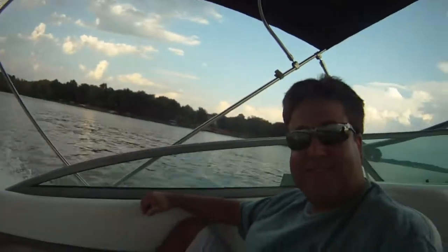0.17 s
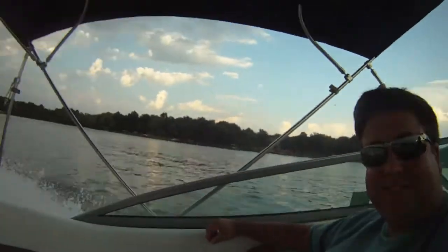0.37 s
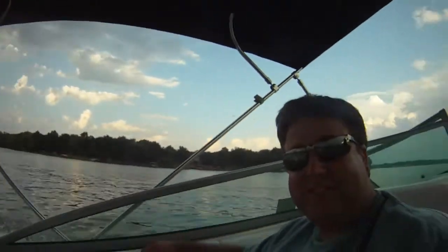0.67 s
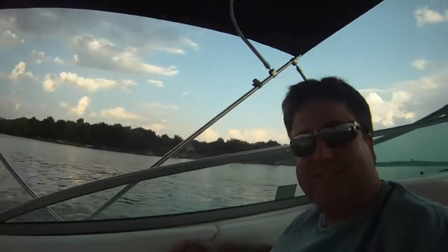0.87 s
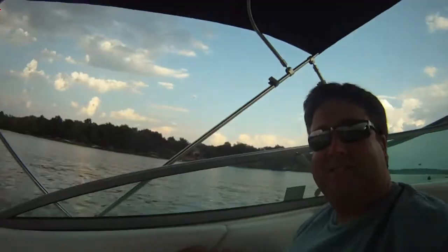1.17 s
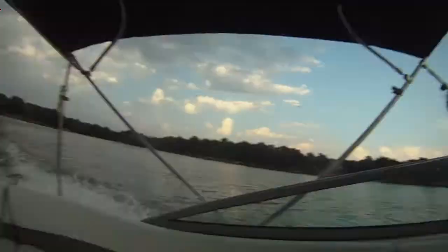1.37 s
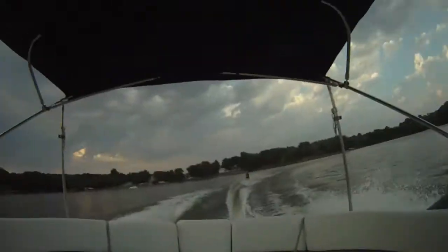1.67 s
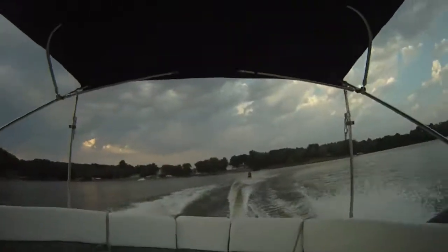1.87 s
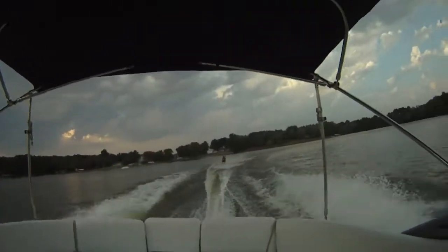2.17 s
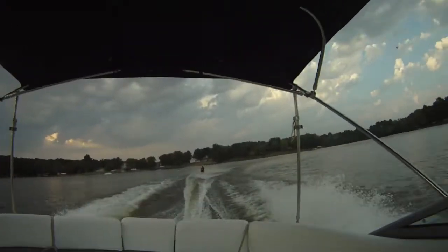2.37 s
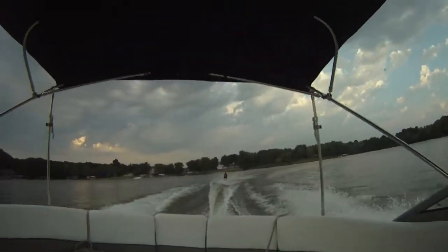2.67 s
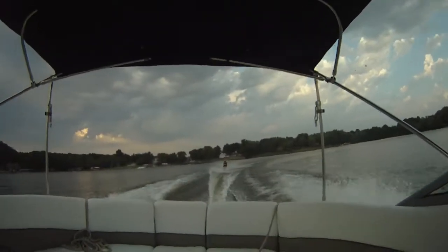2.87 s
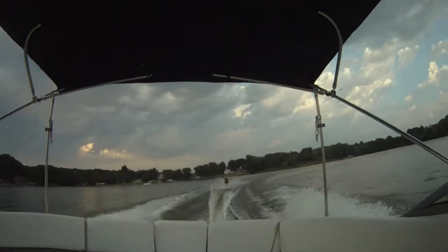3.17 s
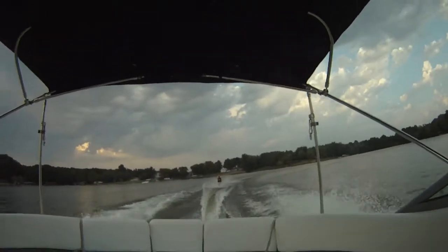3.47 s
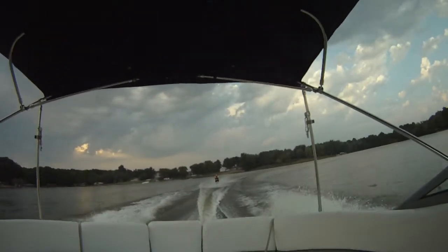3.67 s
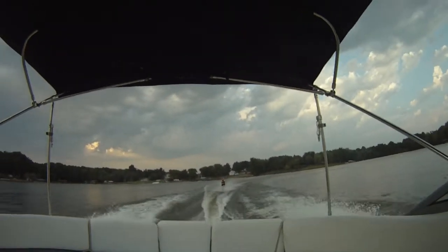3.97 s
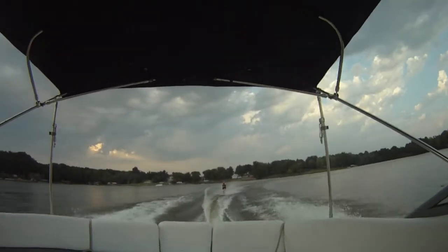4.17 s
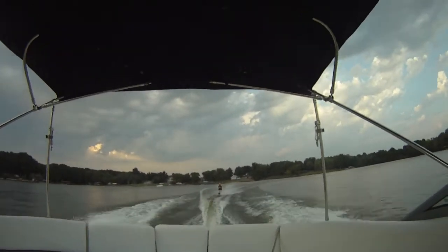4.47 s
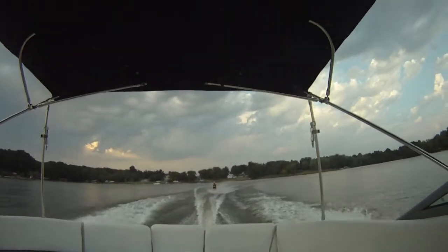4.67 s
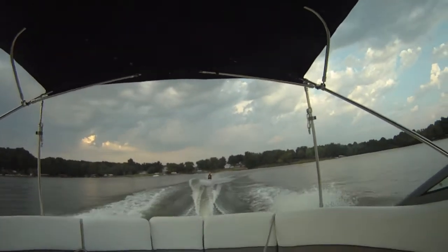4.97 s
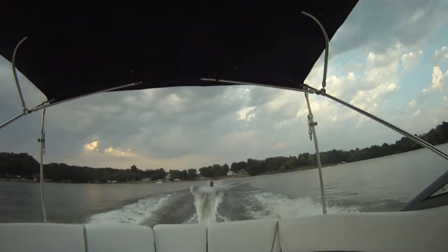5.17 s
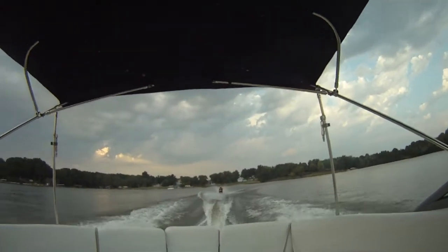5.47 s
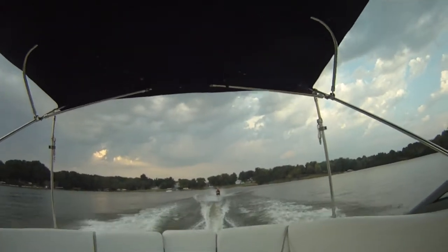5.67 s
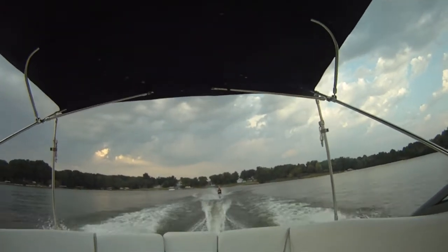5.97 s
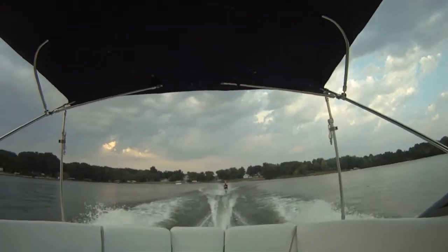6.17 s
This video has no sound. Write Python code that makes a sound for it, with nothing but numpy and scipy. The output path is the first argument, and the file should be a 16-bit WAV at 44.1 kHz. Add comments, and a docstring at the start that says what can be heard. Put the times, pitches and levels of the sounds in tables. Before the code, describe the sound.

Close plastic rattles and creaks break over a hollow water roar and low engine drone, then the lake ride settles with only occasional knocks.

```python
"""Motorboat on a lake

A motorboat tows a skier; a small camera on board, in a plastic case, hears it. The engine hum is a sum of
sines on multiples of the engine cycle. Wake, bow spray and gusty wind are filtered noise.
Filtered noise also gives the rubbing of fingers on the case. Creaks, taps and knocks are impulse responses
of its resonances. The bow hiss is lost as the camera turns to the stern."""
import sys
import numpy as np
from scipy import signal
from scipy.fft import rfft, irfft
from scipy.io import wavfile
from scipy.ndimage import uniform_filter1d

SR = 44100
rng = np.random.default_rng(int(sys.argv[2]) if len(sys.argv) > 2 else 0)


def generate_wav(signal):
    """Clip the signal to [-1, 1] and save it as 16-bit WAV at the path in sys.argv[1]."""
    frames = np.transpose(np.atleast_2d(signal))
    scaled = np.clip(frames, -1, 1) * 32767
    pcm = np.round(scaled).astype(np.int16)
    wavfile.write(sys.argv[1], SR, pcm)


N = 279153
TIME = np.arange(N) / SR
FREQS = np.fft.rfftfreq(N, 1 / SR)

# Colour of the wind: f/Hz, relative spectral level/dB
WIND_SPECTRUM = [(8, 0), (20, 0), (45, 1), (80, -1), (160, -11.5), (300, -22), (700, -26), (3000, -37)]
# Gusts: peak t/s, length/s, peak level/dB
GUST_ROWS = [(.14, 0.28, -38.5), (.42, .26, -36), (.81, 0.32, -40), (1.29, 0.46, -42.5), (2.06, .12, -43),
             (2.26, .18, -45), (2.65, 1, -48), (3.97, 0.11, -49), (4.38, 0.44, -47.5)]
# Modes of the plastic shell: f/Hz, width/Hz, relative level/dB
SHELL_MODES = [(714, 260, -22), (1158, 184, -4.5), (1533, 380, -2.5), (2127, 266, 0), (2250, 114, -1.5),
               (3476, 340, -10), (3715, 230, -13), (4950, 630, -26)]
# Ring of the camera mount, which depends on the grip: t/s, f/Hz
MOUNT_PITCH = [(0, 892), (3, 885), (4.4, 830)]
# Fingers rubbing the case: peak t/s, length/s, peak level/dB
RUB_STROKES = [(.366, 0.053, -31), (.39, 0.38, -39.5), (.8, 0.19, -46), (1.4, 0.25, -40.5)]
# Stick-slip jerks of the creaking case: t/s, level/dB
CREAK_JERKS = [(.41148, -12.5), (.4183, -10.5), (.42706, -11), (.44599, -8.6), (.4522, -10),
               (.45774, -10.5), (.46347, -11.5), (.47177, -12.5)]
# Fingers tapping the shell: t/s, level/dB, thump level/dB re shell, brightness/(dB per octave)
FINGER_TAPS = [(.2915, -27, -4, 7), (.3394, -19, 3, -2), (.7702, -33, -5, -4), (.7825, -24.5, -1, -6),
               (.7933, -27.5, -5, -10), (.8748, -24.5, -19, 1.5), (1.3292, -18.5, 3.5, -3),
               (1.4501, -31.5, -8, 4), (2.0574, -32, 0, -10), (2.074, -28, -2, -5), (2.1316, -26, -14, -2)]
# Knocks of the case in its mount: t/s, level/dB, thump level/dB re shell, mount level/dB re shell
MOUNT_KNOCKS = [(.3075, -23, 8, 8), (0.3121, -21, 10, 9), (0.326, -18.5, 11, 4), (.3441, -19, 0, 2),
                (2.8798, -39, -4, 12), (2.894, -37, 4, 8), (2.9052, -35.5, 12, 8), (2.9349, -34.5, 6, 9),
                (2.996, -26.5, -14, 4), (3.168, -40, 0, 10), (4.3378, -30.5, 5, 2), (4.3713, -32.5, 1, 3),
                (4.416, -25, 0, 7), (5.04, -37, -7, 9)]
# Rush of the wake before the case colours it: f/Hz, relative spectral level/dB
WAKE_SPECTRUM = [(30, -16), (100, -3), (190, 0), (300, -7.5), (400, -7), (620, -12), (1000, -7),
                 (1300, -10.5), (1900, -10.5), (2600, -5), (3700, -3.5), (4150, -12.5), (5300, -9.5),
                 (5900, -18.5)]
# Air resonances of the hollow case, applied to the wake: f/Hz, width at half the lift/Hz, lift level/dB
CASE_CAVITY = [(484, 60, 1.5), (920, 60, 4.5), (1496, 157, 7), (1767, 59, 6), (2181, 390, 16.5),
               (3054, 240, 5), (3363, 233, 4.5), (5110, 170, 3.5)]
# Engine speed: t/s, firing rate f/Hz
FIRING_RATE = [(0, 218), (1.5, 218), (3.3, 219), (4.4, 220.4), (5.1, 220.1), (6, 221.5), (6.33, 220.7)]
# Exhaust tones: multiple of the engine cycle, relative level/dB before the tilt
EXHAUST_TONES = [(4, 2), (6, -8), (7, -8), (8, -0.5), (9, -8), (10, -11.5), (11, -9), (12, -16.5),
                 (14, -16.5), (15, -40), (16, -6.5), (17, -14.5), (18, -27), (19, -18), (33, -16),
                 (35, -13.5), (37, -34), (44, -18.5)]

# Steady wind sinks from the open level to the sheltered one
WIND_OPEN_DB, WIND_SHELTERED_DB, WIND_SETTLED_S = -44, -53.5, 2.9
# Whole case bouncing, and the width of the mount resonance
THUMP_HZ, THUMP_WIDTH_HZ, MOUNT_WIDTH_HZ = 129, 322, 173
# Thump and mount levels are relative to the shell
CREAK_THUMP_DB, CREAK_BRIGHT_DB_PER_OCTAVE, CREAK_MOUNT_DB = -2, -1.5, -30
TAP_MOUNT_DB, KNOCK_BRIGHT_DB_PER_OCTAVE = -4.5, 7
# Middle and length of the turn to the stern, and the hiss heard before it
TURN_S, TURN_LENGTH_S = 1.37, .25
BOW_HZ, BOW_WIDTH_HZ, BOW_DB = 4560, 390, -57
# Wake: starting level, slow fall, rms depth and upper rate of its random swell
SPRAY_DB, SPRAY_DB_PER_S, SWELL_DB, SWELL_HZ = -39, -0.2, 0.32, 1.2
# Engine: starting level and spectral tilt, each with its change per second
HUM_DB, HUM_DB_PER_S, CYLINDERS = -45.5, -0.41, 8
TILT_DB_PER_OCTAVE, TILT_DB_PER_OCTAVE_PER_S = -2.5, 0.74
# Sampling rate of the camera and its final band limit
SAMPLING_HZ, EDGE_HZ = 12000, 15350


def amp(db):
    """Level to amplitude: 20 dB is a factor of ten."""
    return 10 ** (np.asarray(db) / 20)


def evened(x):
    """Normalisation: scales a signal to rms 1."""
    return x / np.sqrt(np.mean(x ** 2) + 1e-20)


def curve(rows):
    """Linear interpolation of (t/s, value) rows over the scene."""
    return np.interp(TIME, *np.transpose(rows))


def spectrum(points, hz):
    """Linear interpolation of (f/Hz, level/dB) points on a log-frequency axis."""
    f, db = np.transpose(points)
    return np.interp(np.log(hz + 1), np.log(f + 1), db)


def peak(hz, centre, width):
    """Resonance: the amplitude gain falls to half at half the width from the centre."""
    return 1 / (1 + (2 * (hz - centre) / width) ** 2)


def coloured(x, gain):
    """Linear filtering by a gain over FREQS, then scaling to rms 1."""
    return evened(irfft(rfft(x) * gain, N))


def drift(rate_hz):
    """Low-pass noise: a random fluctuation of rms 1, mostly slower than rate_hz."""
    slow = coloured(rng.standard_normal(N), 1 / (1 + (FREQS / rate_hz) ** 4))
    return evened(slow - slow.mean())


def swells(rows):
    """Power addition of half-cosine envelopes, one per (peak t/s, length/s, level/dB) row."""
    power = 0
    for s, length, db in rows:
        phase = np.pi * np.clip((TIME - s) / length, -.5, .5)
        power = power + (amp(db) * np.cos(phase)) ** 2
    return np.sqrt(power)


def wind(lumps_db=2.5):
    """Turbulence: lumpy low-frequency eddies buffet the case, steadily and in gusts."""
    lumpy = rng.standard_normal(N) * amp(lumps_db * drift(31))
    eddies = coloured(lumpy, amp(spectrum(WIND_SPECTRUM, FREQS)))
    # Even out the slow power, so that the steady wind and gusts set the slow swell
    eddies /= np.sqrt(uniform_filter1d(eddies ** 2, size=SR // 8))
    steady = amp(np.interp(TIME, [0, WIND_SETTLED_S], [WIND_OPEN_DB, WIND_SHELTERED_DB]))
    return np.hypot(steady, swells(GUST_ROWS)) * eddies


def shell(hz):
    """Modal response: the modes of the plastic shell add in power."""
    power = sum((amp(db) * peak(hz, centre, width)) ** 2 for centre, width, db in SHELL_MODES)
    return np.sqrt(power)


def rubbing(grain_db=4):
    """Friction: fine random grains excite the shell under each stroke of the fingers."""
    grains = rng.standard_normal(N) * amp(grain_db * drift(160))
    return swells(RUB_STROKES) * coloured(grains, shell(FREQS))


def ring(gain, size=2048):
    """Minimum phase: a gain over frequency fixes the causal response; rms 1 over its first 2 ms."""
    two_sided = np.r_[gain, gain[-2:0:-1]]
    log_gain = np.log(np.maximum(two_sided, 1e-4))
    response = np.exp(np.conj(signal.hilbert(log_gain)))
    sound = np.fft.ifft(response).real[:size // 2]
    return sound / np.sqrt(np.mean(sound[:SR // 500] ** 2))


def click(s, db, thump_db, bright_db, mount_db, size=2048):
    """Impulse response: one blow rings the shell and the mount, and shoves the whole case."""
    hz = np.fft.rfftfreq(size, 1 / SR)
    shove = peak(hz, THUMP_HZ, THUMP_WIDTH_HZ) * hz / np.hypot(hz, 70)  # high-passed at 70 Hz
    octaves = np.log2(np.clip(hz, 700, 3000) / 1600)  # brightness tilts about 1600 Hz
    mount = peak(hz, np.interp(s, *np.transpose(MOUNT_PITCH)), MOUNT_WIDTH_HZ)
    parts = [shell(hz) * amp(bright_db * octaves), amp(thump_db) * shove, amp(mount_db) * mount]
    return -amp(db) * ring(np.linalg.norm(parts, axis=0))  # parts add in power


def add(mix, s, sound):
    """Superposition: adds a sound to the mix at time s."""
    part = mix[round(s * SR):][:len(sound)]
    part += sound[:len(part)]


def creaks(mix):
    """Stick-slip: each sudden slip of the creaking case is a blow."""
    for s, db in CREAK_JERKS:
        add(mix, s, click(s, db, CREAK_THUMP_DB, CREAK_BRIGHT_DB_PER_OCTAVE, CREAK_MOUNT_DB))


def taps(mix):
    """Impact: each finger tap excites the shell with its own thump and brightness."""
    for s, db, thump_db, bright_db in FINGER_TAPS:
        add(mix, s, click(s, db, thump_db, bright_db, TAP_MOUNT_DB))


def knocks(mix):
    """Impact: each knock of the case in its mount has its own thump and mount ring."""
    for s, db, thump_db, mount_db in MOUNT_KNOCKS:
        add(mix, s, click(s, db, thump_db, KNOCK_BRIGHT_DB_PER_OCTAVE, mount_db))


def handling():
    """Superposition of the creaks, taps and knocks of the case."""
    mix = np.zeros(N)
    creaks(mix)
    taps(mix)
    knocks(mix)
    return mix


def bow_spray():
    """Directivity: a narrow band of hiss from beside the hull is lost as the camera turns away."""
    facing = np.clip(.5 - (TIME - TURN_S) / TURN_LENGTH_S, 0, 1)
    hiss = coloured(rng.standard_normal(N), peak(FREQS, BOW_HZ, BOW_WIDTH_HZ))
    return amp(BOW_DB) * facing * hiss


def wake(churn_db=.5, splash_share=0.28, drops_per_s=1500, drop_spread_db=3):
    """Cavity resonance: the hollow case colours churning water and random splashes of spray."""
    struck = rng.random(N) < drops_per_s / SR
    drop_db = drop_spread_db * np.minimum(rng.exponential(1, N), 4)
    drops = struck * rng.standard_normal(N) * amp(drop_db)
    churn = rng.standard_normal(N) * amp(churn_db * drift(18))
    water = churn + splash_share * evened(drops)
    hollow_db = sum(db * np.exp2(-(2 * (FREQS - hz) / width) ** 2) for hz, width, db in CASE_CAVITY)
    spray_db = SPRAY_DB + SPRAY_DB_PER_S * TIME + SWELL_DB * drift(SWELL_HZ)
    return amp(spray_db) * coloured(water, amp(spectrum(WAKE_SPECTRUM, FREQS) + hollow_db))


def engine():
    """Harmonic series: uneven firing puts fluttering tones on multiples of the engine cycle."""
    wobble, uneven = .0007, .18  # relative depths of the speed and tone fluctuations
    cycle_hz = curve(FIRING_RATE) / CYLINDERS * (1 + wobble * drift(4.8))
    cycles = np.cumsum(cycle_hz) / SR
    level_db = HUM_DB + HUM_DB_PER_S * TIME
    tilt_db = TILT_DB_PER_OCTAVE + TILT_DB_PER_OCTAVE_PER_S * TIME
    knots = np.linspace(0, TIME[-1], 30)
    hum = np.zeros(N)
    for order, db in EXHAUST_TONES:
        flutter = 1 + uneven * np.interp(TIME, knots, rng.standard_normal(len(knots)))
        octaves = np.clip(np.log2(order / CYLINDERS), -1, 1)  # from the firing rate
        tone = np.sin(2 * np.pi * (round(order) * cycles + rng.random()))
        hum += amp(db + tilt_db * octaves) * flutter * tone
    return amp(level_db) * evened(hum)


def scene():
    """Superposition: all sources add at the one microphone inside the case."""
    return (wind() + rubbing() + handling() + bow_spray() + wake() + engine())[None]


def record(dry):
    """Sample and hold: slow sampling with held values mirrors sound into the treble; a low-pass follows."""
    slow = signal.resample(dry, round(N * SAMPLING_HZ / SR), axis=1)
    steps = np.repeat(np.clip(slow, -1, 1), 4, axis=1)
    held = signal.resample(steps, N, axis=1)
    low_pass = signal.firwin(511, EDGE_HZ, window=("kaiser", 9), fs=SR)
    return signal.oaconvolve(held, low_pass[None], "same")


dry = scene()
out = record(dry)
generate_wav(out)
```